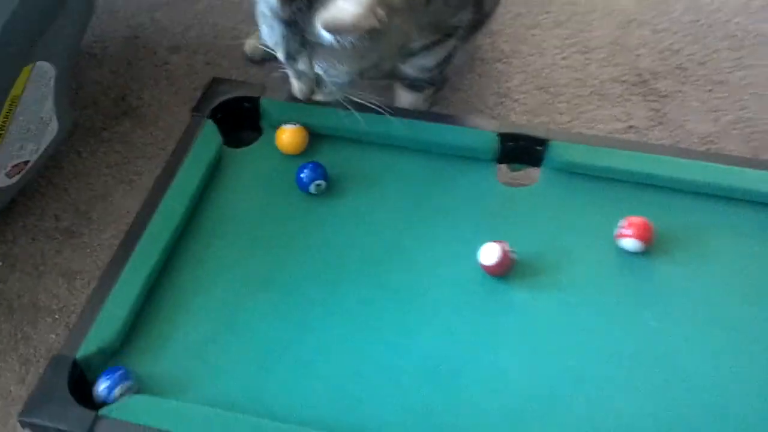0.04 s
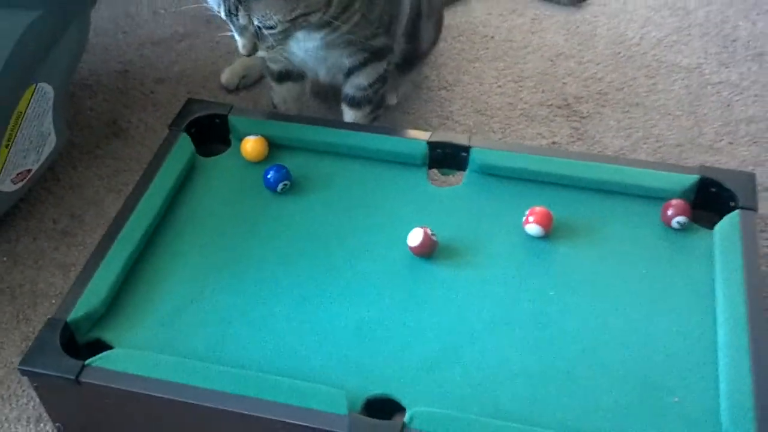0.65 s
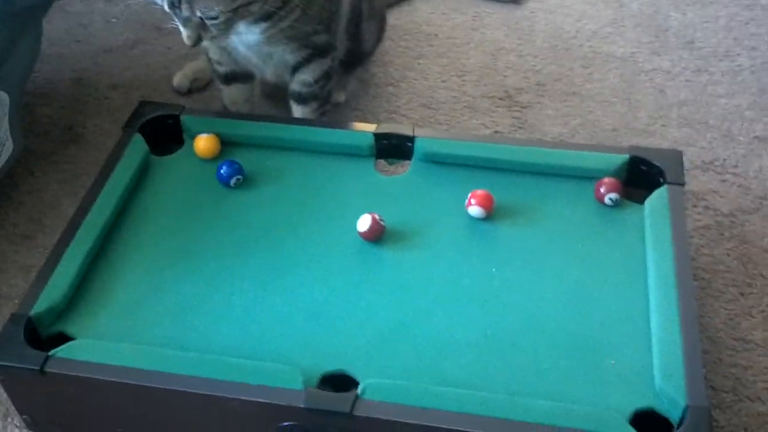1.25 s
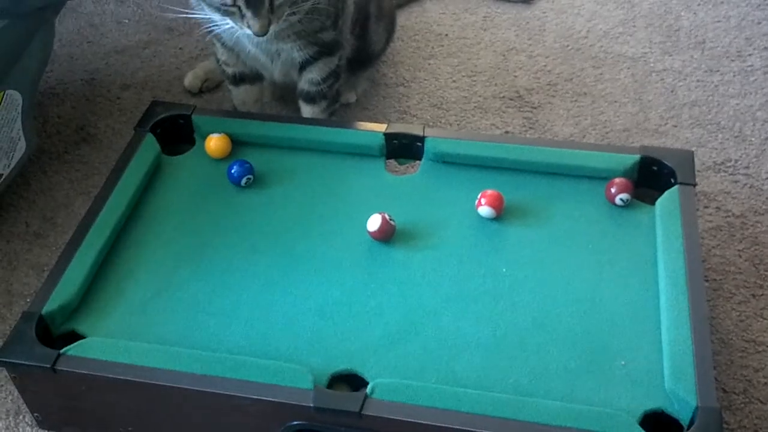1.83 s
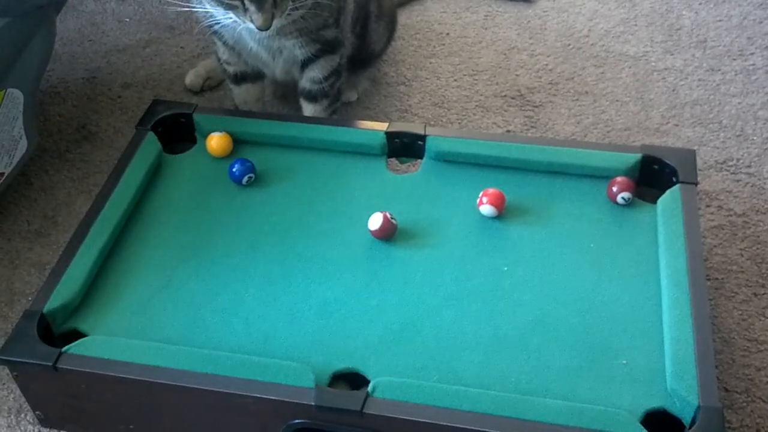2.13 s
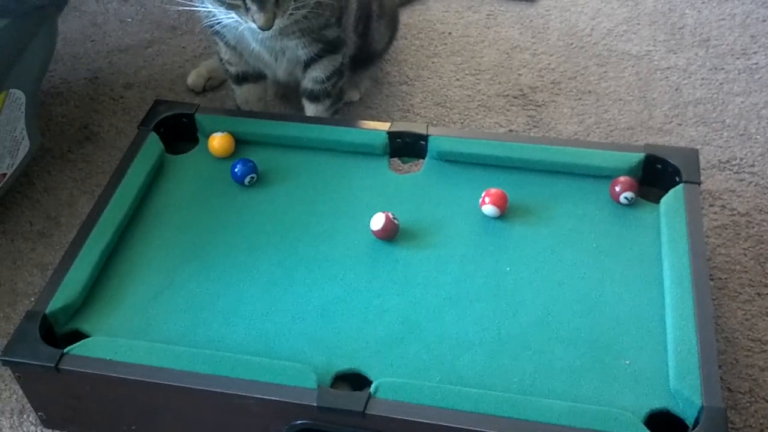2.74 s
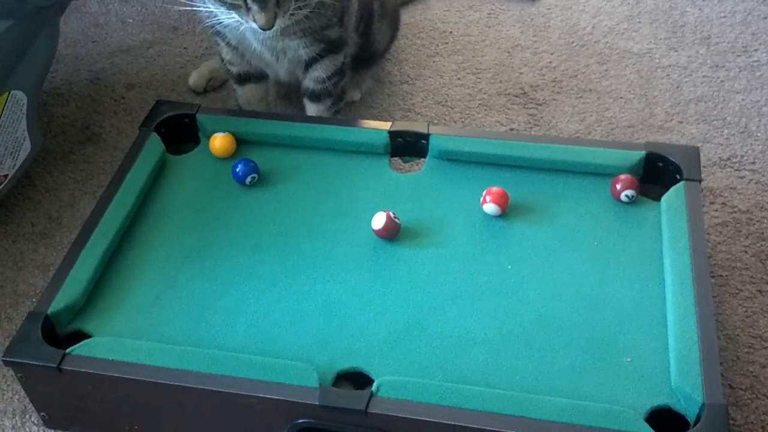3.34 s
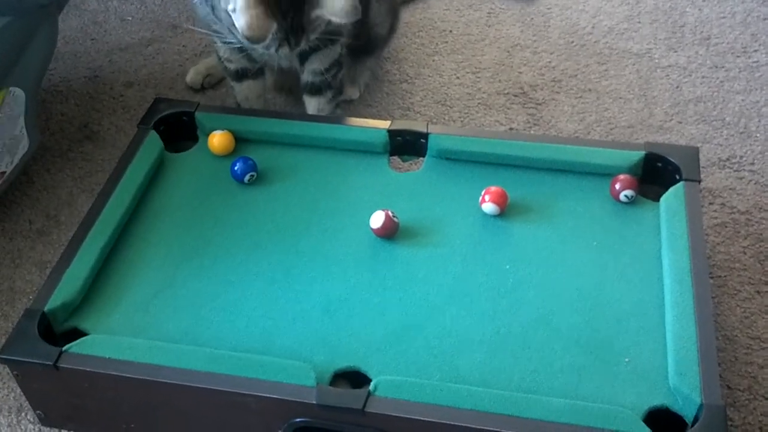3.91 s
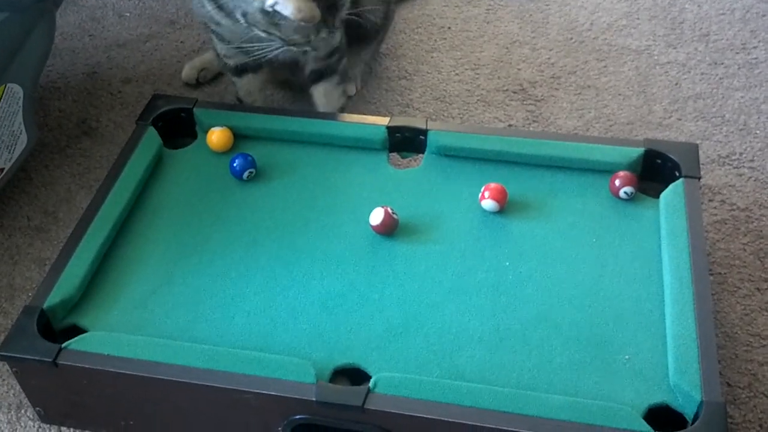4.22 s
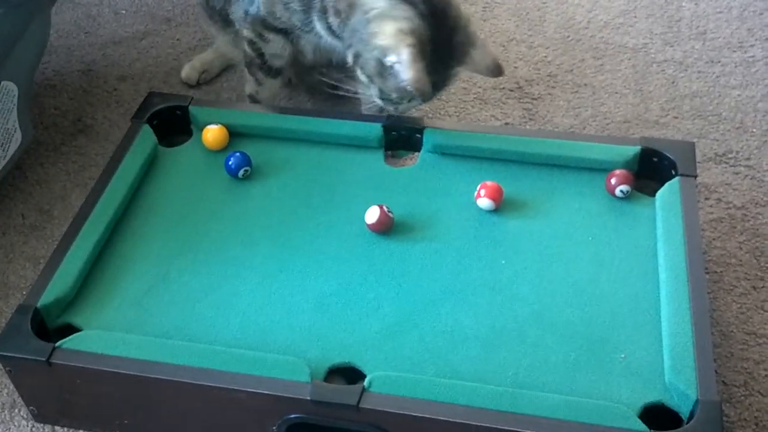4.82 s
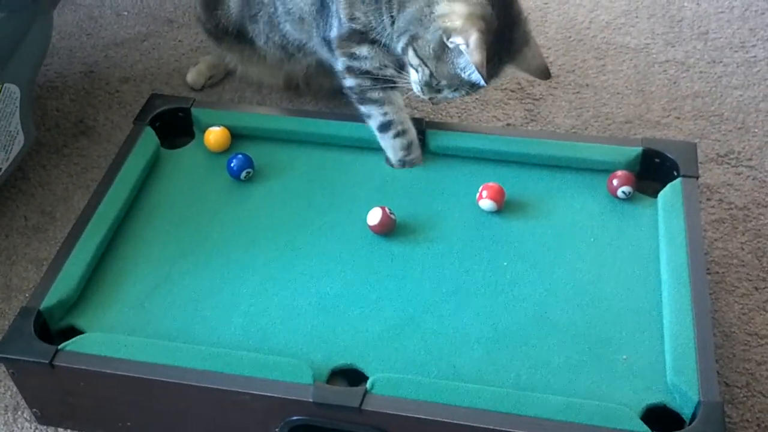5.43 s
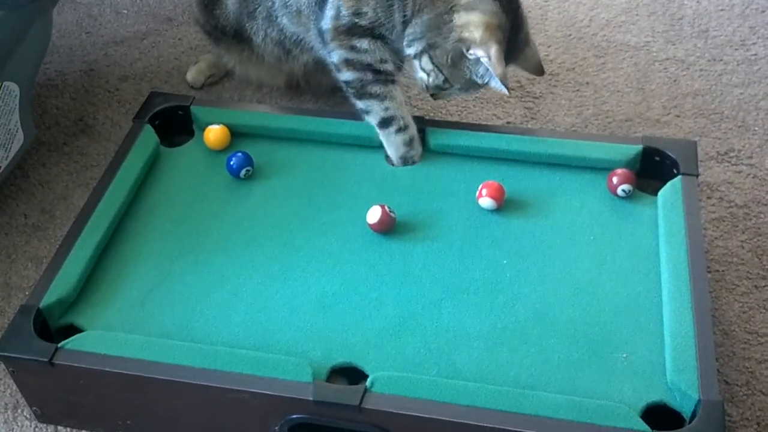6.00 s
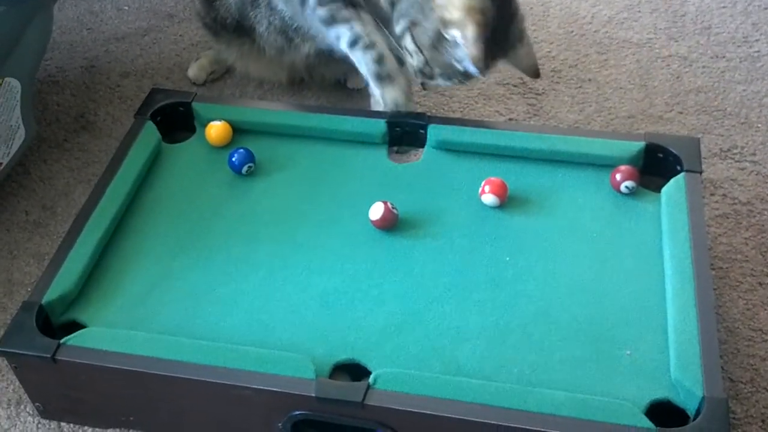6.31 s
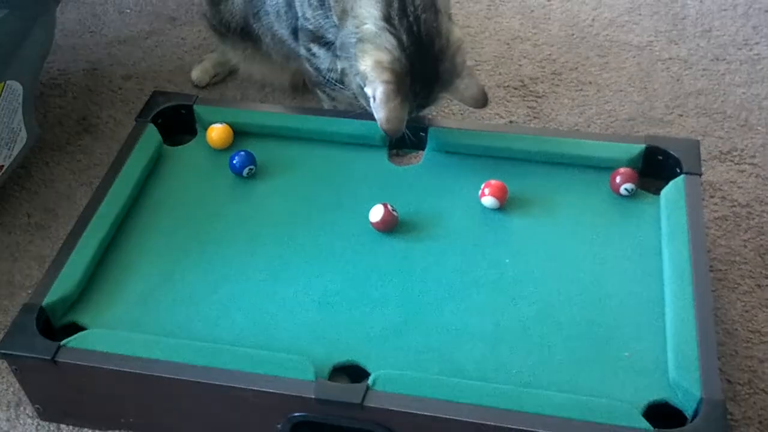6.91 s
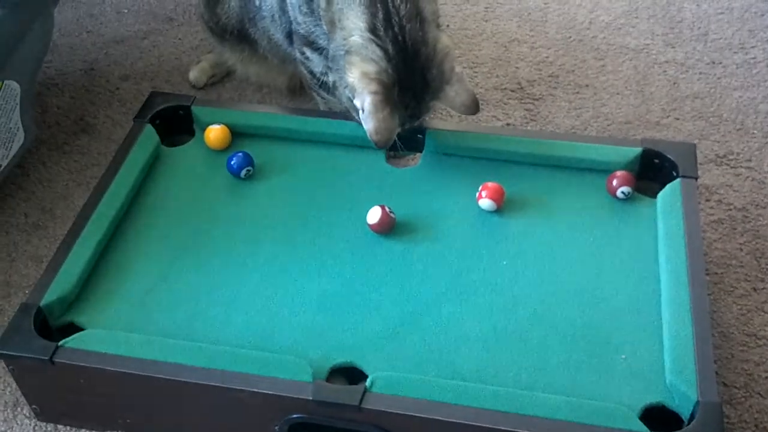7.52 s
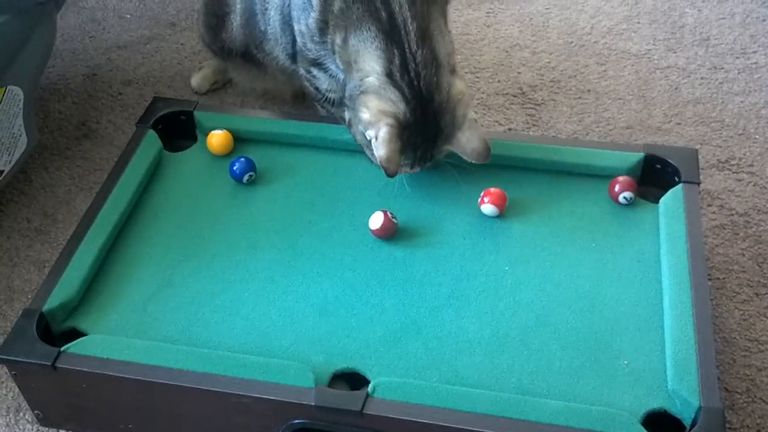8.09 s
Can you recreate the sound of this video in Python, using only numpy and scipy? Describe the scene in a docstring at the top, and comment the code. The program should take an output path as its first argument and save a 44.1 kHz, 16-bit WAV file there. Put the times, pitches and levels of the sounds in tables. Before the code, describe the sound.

Sharp clack and hollow rattling roll of a ball inside a toy pool table, then soft paw taps and lighter knocks over low room hum.

```python
"""A brief brush on cloth, then a ball clacks into a pocket: a cat is playing at a toy pool table.
The ball rolls down the return chute and rattles to rest; later a paw knocks a ball about a side pocket.
Each contact clicks and pings on plastic, knocks the frame and thuds the board. The carpeted room has a
low hum. Two close microphone ports are crossed into stereo; gain control ducks after the drop."""
import sys
import numpy as np
from scipy import signal
from scipy.fft import rfft, irfft, next_fast_len
from scipy.io import wavfile
from scipy.ndimage import uniform_filter1d, minimum_filter1d

SR = 44100
rng = np.random.default_rng(int(sys.argv[2]) if len(sys.argv) > 2 else 0)


def pcm_store(signal):
    """Save signal as 16-bit PCM."""
    levels = np.round(np.clip(np.atleast_2d(signal), -1, 1) * 32767)
    wavfile.write(sys.argv[1], SR, levels.astype(np.int16).T)


N = 359415
TIME = np.arange(N) / SR
AGE = TIME[:SR // 6]   # seconds since a blow


# Ball on pocket or chute. Each row: start in seconds, thud in dB, thud pitch in Hz, knock in dB,
# knock pitch in Hz, click in dB, click hardness in dB per octave, ping in dB.
BALL_HITS = [(0.132, -57, 473, -56.5, 1460, -77, -9, -75), (0.2273, -39.5, 726, -50, 905, -41.5, 13, -40),
             (0.2363, -11.5, 423, -19.5, 1720, -15, 5, -21.5), (0.2385, -22, 685, -25, 760, -42, -6, -42),
             (0.304, -30, 390, -30, 925, -36.5, 1, -29), (0.3253, -19, 414, -25.5, 770, -27.5, 1.5, -21.5),
             (0.3355, -42, 418, -39, 890, -45, 9, -56), (0.368, -26.5, 443, -38, 840, -44.5, -7, -48),
             (0.388, -31, 483, -38.5, 1096, -45.5, -2.5, -35), (1.335, -22.5, 338, -26, 1650, -25, -2, -38),
             (1.349, -30, 398, -41, 910, -57, -9, -60), (1.3595, -36, 300, -53, 1410, -51, 6, -56),
             (1.365, -41, 347, -45, 1570, -40, -2, -56), (1.386, -28, 640, -28.5, 1500, -29.5, 9, -39),
             (1.389, -30, 267, -39, 1340, -45, 0, -58), (1.404, -31, 340, -40, 1190, -52, -4, -65),
             (1.4235, -51, 348, -51, 1480, -47, 3, -65), (1.436, -30, 673, -36, 1360, -32, 9, -39),
             (1.446, -25.5, 305, -54, 1470, -41, 0, -55), (1.449, -27.5, 335, -24, 1780, -36, -6, -49),
             (1.462, -47, 328, -43, 1300, -38, 3, -60), (1.474, -27, 363, -31, 1250, -33.5, 5, -40),
             (1.499, -30, 316, -41, 795, -48, 5, -62), (1.509, -50, 348, -39.5, 1740, -45, 4, -40),
             (1.521, -39, 300, -59, 1300, -50, -3, -65.5), (1.5245, -28.5, 360, -44, 1380, -45, 4, -62),
             (1.537, -35.5, 242, -41, 1260, -46, -4, -60), (1.553, -46, 230, -46.5, 1390, -59, -12, -74),
             (1.6575, -25.5, 351, -36.5, 1810, -39, -4, -60), (1.748, -36, 348, -54, 1820, -56, -12, -80),
             (1.78, -52.5, 400, -60, 1400, -64, -9, -75), (1.8922, -24.5, 341, -32, 1710, -37.5, -6.5, -70),
             (1.97, -38.5, 377, -58, 1020, -71, -2, -75), (1.976, -40, 308, -58, 1940, -52, -4, -64),
             (1.9805, -40, 287, -38, 930, -46.5, -17, -65), (5.7948, -79, 500, -60, 1800, -40, -7, -51),
             (5.7972, -36, 333, -33.5, 960, -50, -9, -43), (5.8028, -32.5, 250, -37, 1710, -55, -11, -57),
             (6.5153, -38, 339, -34.5, 1020, -45.5, -14, -62), (6.526, -47, 270, -41.5, 940, -51, -16, -64),
             (6.5415, -45, 260, -47, 1480, -61, -9, -70), (6.589, -50, 436, -48.5, 1530, -70, -9, -72),
             (6.6852, -35.5, 496, -29, 1450, -41.5, 1, -39), (6.706, -35, 420, -34.5, 1400, -43, -11, -39),
             (6.7243, -31.5, 357, -34, 1033, -42, -1, -47), (6.7285, -43, 420, -38.5, 1380, -49, -7, -54),
             (6.737, -50, 336, -53, 1310, -45.5, -10, -62), (6.741, -38, 385, -38, 1230, -48, 3, -37.5),
             (6.754, -35, 281, -37, 1500, -50, -6, -41), (6.765, -44, 378, -42.5, 1620, -57, -9, -44),
             (6.773, -55, 300, -51, 1590, -62, -12, -54), (6.781, -38.5, 219, -71, 1300, -70, -9, -75),
             (6.842, -53, 400, -53, 1270, -74, -11, -70), (6.9458, -41, 335, -38.5, 1005, -53.5, -14, -71)]

def balls():
    """Each contact sounds board, frame and plastic. Returns head-on and sideways sound."""
    out = np.zeros((2, N))
    contacts = list(BALL_HITS) + seam_bumps() + chatter()
    for start, thud_db, thud_hz, knock_db, knock_hz, click_db, hardness, ping_db in contacts:
        ring_scale = ring_length(max(knock_db, thud_db - 3))
        modes = damped_modes(ring_scale)
        thud = board_thud(thud_hz, thud_db, modes, ring_scale)
        knock = frame_knock(knock_hz, modes, ring_scale)
        add(out, start, from_db(thud_db) * thud + from_db(knock_db) * knock)
        add(out[0], start, from_db(click_db) * click(hardness, ring_scale) + from_db(ping_db) * ping())
    return out


USUAL_BLOW_DB = -29.5

def ring_length(blow_db, halving_db=4.5):
    """Factor on decay times: the harder the blow, the more the ball damps the wood."""
    return np.clip(0.93 * 2 ** ((USUAL_BLOW_DB - blow_db) / halving_db), 0.39, 0.93)


# Dense modes of the board. Each row: frequency in Hz, relative level in dB.
THUD_SPECTRUM = [(120, -45.5), (220, 5), (380, 8.5), (540, -17), (760, -9), (900, -16.5), (1500, -62)]

def board_thud(hz, blow_db, modes, ring_scale):
    """The board's note, with an overtone that grows with the blow."""
    overtone_db = min(-34.5 + 6 * (blow_db - USUAL_BLOW_DB), 0)
    note = ring(hz, 0.04 * ring_scale, rise_s=0.001)
    overtone = from_db(overtone_db) * ring(2.9 * hz, 0.014 * ring_scale, rise_s=0.001)
    envelope = fade(0.14 * ring_scale, rise_s=0.00024)
    thud = body(note + overtone, hz, modes, THUD_SPECTRUM, envelope,
                modes_db=2, dense_db=2.5, side_db=-2, reach_octaves=0.54)
    # so small a board radiates little below its own note
    return cut(thud, 0.68 * hz, "high", order=3)


# Dense modes of the frame. Each row: frequency in Hz, relative level in dB.
KNOCK_SPECTRUM = [(500, -14.5), (900, 4), (1600, 5), (2100, -4), (2600, -10.5), (4000, -41), (8000, -55.5)]

def frame_knock(hz, modes, ring_scale):
    """The frame barks briefly, then rings on faintly."""
    note = ring(hz, 0.015 * ring_scale, rise_s=0.002)
    bark = fade(0.031 * ring_scale, rise_s=0.0008) + 0.1 * fade(0.13 * ring_scale, rise_s=0.0013)
    return body(note, hz, modes, KNOCK_SPECTRUM, bark,
                modes_db=-5, dense_db=-3, side_db=0, reach_octaves=0.52)


# Modes of board and frame. Each row: frequency in Hz, relative level in dB, free T60 in seconds.
WOOD_MODES = [(197.3, 4, 0.37), (232.2, 7, 0.5), (284.4, -1.5, 0.08), (350, -4.5, 0.05), (405, -3.5, 0.067),
              (617, -0.5, 0.091), (731.4, 6.5, 0.085), (801, 5, 0.082), (866, -0.5, 0.097), (968, 3, 0.15),
              (1052, -3, 0.07), (1268, 0, 0.18), (1360, 5, 0.094), (1447, 4, 0.08), (1568, 5.5, 0.041),
              (1650, 15, 0.041), (1770, 2.5, 0.026), (2110, -14, 0.028)]

def damped_modes(ring_scale):
    """One ring per mode, damped by the ball pressing on the wood."""
    free = np.array([ring(hz, t60_s, rise_s=0.0013) for hz, _, t60_s in WOOD_MODES])
    return free * np.exp(-max(1 / ring_scale - 1, 0) * AGE / 0.0026)


def body(note, note_hz, modes, spectrum, envelope, modes_db, dense_db, side_db, reach_octaves):
    """The struck spot's note, nearby modes and a dense ring. Returns head-on and sideways sound."""
    hz, db, _ = np.transpose(WOOD_MODES)
    nearness = np.exp(-.5 * (np.log2(hz / note_hz) / reach_octaves) ** 2)
    # neighbouring modes alternate in sign head-on; sideways the signs are random
    signs = np.array([(-1) ** np.arange(len(hz)), rng.choice([-1, 1], len(hz))])
    panels = []
    for strengths in signs * from_db(2.5 * rng.standard_normal((2, len(hz)))):
        modal = unit_blow((from_db(db) * nearness * strengths) @ modes)
        dense = unit_blow(colour(rng.standard_normal(len(AGE)), spectrum) * envelope)
        panels.append(from_db(modes_db) * modal + from_db(dense_db) * dense)
    head_on = unit_blow(unit_blow(note) + panels[0])
    return np.array([head_on, from_db(side_db) * unit_blow(panels[1])])


# Modes of ball on plastic. Each row: frequency in Hz, relative level in dB, T60 in seconds.
PLASTIC_MODES = [(2014, 5, 0.0087), (3330, 1.5, 0.0066), (3830, 6.5, 0.0022), (4300, -6, 0.0034),
                 (6310, -13, 0.0016), (7600, -2, 0.0024), (8900, -1, 0.0023), (9600, -4, 0.0012),
                 (12000, -12.5, 0.002)]
# Dense modes behind the click. Each row: frequency in Hz, relative level in dB.
SPLASH_SPECTRUM = [(1500, -40), (2300, -13), (2700, -12), (3300, 3.5), (4000, 4), (5000, -4.5), (5700, -4),
                   (6700, -10), (8700, -9.5), (11000, -20.5), (16000, -37)]

def click(tilt_db_per_octave, ring_scale, echo_s=0.0027, echo_db=-14, splash_db=-2):
    """Hard ball on plastic: a crack, a quick echo of it and a splash that dulls as it dies."""
    crack = np.zeros(len(AGE))
    for k, (hz, db, t60_s) in enumerate(PLASTIC_MODES):
        mode_db = db + tilt_db_per_octave * np.log2(hz / 3000) + 2 * rng.standard_normal()
        detune = 1 + 0.02 * np.clip(rng.standard_normal(), -2, 2)
        crack += (-1) ** k * from_db(mode_db) * ring(hz * detune, t60_s)
    lag_samples = round(echo_s * SR * rng.uniform(0.5, 1.4))
    echo = from_db(echo_db) * np.pad(crack, (lag_samples, 0))[:len(AGE)]
    noise = colour(rng.standard_normal(len(AGE)), SPLASH_SPECTRUM, tilt_db_per_octave)
    splash = noise * fade(0.025 * ring_scale, rise_s=0.00008)
    tail = 0.058 * cut(noise, 4300, "low", order=1) * fade(0.044 * ring_scale)
    return unit_blow(unit_blow(crack + echo) + from_db(splash_db) * unit_blow(splash + tail))


def ping(hz=2630):
    """The plastic lining rings at a slightly different pitch for each spot struck."""
    detune = 1 + 0.058 * rng.uniform(-1.9, 1)
    return unit_blow(ring(hz * detune, t60_s=0.019, rise_s=0.0003))


# Seams of the chute. Each row: start in seconds, thud level in dB.
CHUTE_SEAMS = [(0.497, -38.5), (0.717, -47.5), (0.9818, -32.5), (1.046, -43.5), (1.1828, -34),
               (1.2402, -38)]

def seam_bumps(thud_hz=394, knock_hz=1040):
    """The rolling ball bumps over seams. Returns rows like BALL_HITS."""
    return [(start, db, thud_hz, db - 14, knock_hz, db - 30.5, 0, db - 32) for start, db in CHUTE_SEAMS]


# A ball settling. Each row: start in seconds, end in seconds, initial knock level in dB.
SETTLING = [(1.4, 1.58, -57), (6.722, 6.79, -56)]

def chatter(gap_s=0.019, fade_db_per_s=28, thud_hz=332, knock_hz=1390):
    """Light, uneven touches between the walls. Returns rows like BALL_HITS."""
    touches = []
    for start, end, first_db in SETTLING:
        for k, (jitter, force, spot) in enumerate(rng.uniform(-1.2, 1, size=(12, 3))):
            onset = start + gap_s * (k + 0.54 * jitter)
            db = first_db - fade_db_per_s * (onset - start) + 3 * force
            detune = 2 ** (0.18 * spot)
            if onset < end:
                touches.append((onset, db + 12, thud_hz * detune, db, knock_hz * detune, db - 2, 0, db - 19))
    return touches


# The ball circles the pocket, creeps into the chute, speeds up, tumbles at its end and rebounds;
# last, a roll in the side pocket. Each row: start and end in seconds, first and last level in dB.
BALL_ROLLS = [(0.24, 0.38, -40, -41.5), (0.42, 0.80, -55, -59.5), (0.81, 1.33, -54.5, -42),
              (1.36, 1.55, -40, -52), (1.62, 2.00, -64.5, -55), (6.725, 6.76, -28.5, -43.5)]
# Ring at the chute's entry. Each row: start and end in seconds, first and last level in dB.
CHUTE_RING = [(0.81, 0.96, -59.5, -53.5)]
# The shaken board. Each row: frequency in Hz, relative level in dB.
ROLL_SPECTRUM = [(130, -23.5), (230, -3), (360, 0.5), (520, -16), (650, -2), (780, -13.5), (950, -15.5),
                 (1500, -24), (2500, -33.5), (6000, -48.5)]

def rolling(bumps_per_s=650, spread_db=3.5, side_db=-3, attack_s=0.01, t60_s=0.11):
    """The chute's grain jolts the ball and shakes the board. Returns head-on and sideways sound."""
    bumps = (rng.random((2, N)) < bumps_per_s / SR) * rng.choice([-1, 1], (2, N))
    bumps = bumps * from_db(spread_db * rng.standard_normal((2, N)))
    forces = [unit_rms(row) + 0.037 * rng.standard_normal(N) for row in bumps]
    head_on, sideways = [unit_rms(colour(force, ROLL_SPECTRUM)) for force in forces]
    out = strokes(BALL_ROLLS, attack_s, t60_s) * np.array([head_on, from_db(side_db) * sideways])
    hollow = signal.fftconvolve(bumps[0], ring(hz=810, t60_s=0.014, rise_s=0.0025))[:N]
    out[0] += strokes(CHUTE_RING, attack_s, t60_s) * unit_rms(hollow)
    return out


# Paw on the frame. Each row: start in seconds, level in dB, pitch in Hz.
PAW_TOUCHES = [(4.515, -53.5, 630), (4.604, -62, 870), (4.636, -65.5, 545), (5.995, -61, 990),
               (6.022, -59, 870), (6.153, -59.5, 1000), (6.184, -66, 1060), (6.365, -54, 615)]

def paws():
    """Padded touches: a dull tap with a short brush of fur."""
    out = np.zeros(N)
    for start, db, hz in PAW_TOUCHES:
        tap = ring(hz, t60_s=0.027, rise_s=0.0022)
        fur = colour(rng.standard_normal(len(AGE)), KNOCK_SPECTRUM) * fade(t60_s=0.23, rise_s=0.00082)
        add(out, start, from_db(db) * unit_blow(unit_blow(tap) + .5 * unit_blow(fur)))
    return out


# Rubs on the cloth. Each row: start and end in seconds, first and last level in dB.
CLOTH_RUBS = [(0.0, 0.13, -53, -59), (4.5, 4.66, -78, -79), (5.98, 6.2, -89, -84), (6.35, 6.45, -63, -69)]
# Rubbing noise. Each row: frequency in Hz, relative level in dB.
CLOTH_SPECTRUM = [(1500, -1), (3500, -3.5), (5500, -1), (9000, -4.5), (12000, -5.5), (16000, 0.5)]

def cloth():
    """Light rubbing on the cloth makes a faint, high hiss."""
    hiss = unit_rms(colour(rng.standard_normal(N), CLOTH_SPECTRUM))
    return strokes(CLOTH_RUBS, attack_s=0.054, t60_s=0.61) * hiss


# Ticks as the cat shifts. Each row: start in seconds, level in dB, pitch in Hz.
CAT_TICKS = [(2.485, -74.5, 7600), (4.516, -69, 4320), (6.378, -65, 3500), (6.41, -69, 6900),
             (7.585, -73, 5100), (7.895, -74, 7700), (8.08, -66, 7600)]

def ticks():
    """Tiny scratches, each a noise burst around one high pitch."""
    out = np.zeros(N)
    for start, db, hz in CAT_TICKS:
        scratch = rng.standard_normal(len(AGE)) * fade(t60_s=0.032)
        tick = signal.fftconvolve(scratch, ring(hz, t60_s=0.0041))
        add(out, start, from_db(db) * unit_blow(tick))
    return out


def room(x, wall_hz=2300, t60_s=0.13, wet_db=-23):
    """The short, soft tail of a carpeted room."""
    wet = []
    for _ in range(2):
        tail = cut(rng.standard_normal(len(AGE)), wall_hz, "low", order=1) * fade(t60_s, rise_s=0.0046)
        wet.append(signal.fftconvolve(x, tail / np.linalg.norm(tail))[:N])
    return from_db(wet_db) * diffuse(*wet)


# Hum and faint whine. Each row: frequency in Hz, level in dB, lag between ports in samples, waver depth.
HUM_TONES = [(119.4, -67.5, -19, 0.19), (175.7, -65.5, 17.5, 0.4), (212.5, -67.5, -18.5, 0.4),
             (298.4, -72, -15, 1), (418, -71.5, 20.5, 0.3), (445, -73.5, -34.5, 0.85),
             (6300, -95, 2.5, 0.8), (6460, -93, -3, 0.9)]

def hum(waver_hz=4):
    """Low hum and a faint electronic whine waver in strength and phase, each tone from its own side."""
    out = np.zeros((2, N))
    knots_s = np.linspace(0, N / SR, int(2 * waver_hz * N / SR) + 2)
    for hz, db, lag_samples, depth in HUM_TONES:
        drift = rng.standard_normal((2, 400))[:, :len(knots_s)]
        waver = 1 + depth * np.interp(TIME, knots_s, drift[0] + 1j * drift[1])
        tone = waver * np.exp(2j * np.pi * hz * TIME)
        lagged = tone * np.exp(-2j * np.pi * hz * lag_samples / SR)
        out += from_db(db) * unit_rms(np.real([tone, lagged]))
    return out


# Room air. Each row: frequency in Hz, noise density in dB.
AIR_SPECTRUM = [(40, -87.5), (80, -99), (120, -87.5), (250, -88), (450, -92), (800, -96), (1300, -102),
                (2000, -105), (4000, -110), (7000, -115), (10500, -118), (15000, -114)]

def air():
    """Steady rush and hiss of the room."""
    common, apart = [colour(rng.standard_normal(N), AIR_SPECTRUM) * np.sqrt(SR / 2) for _ in range(2)]
    return diffuse(common, apart)


def diffuse(common, apart, split_hz=1400):
    """Sound from all round: alike at both ports in the bass, unrelated in the treble."""
    apart = cut(apart, split_hz, "high", order=1)
    return np.array([common + apart, common - apart])


def from_db(db):
    """Decibels to gain."""
    return 10 ** (np.asarray(db) / 20)


def unit_rms(x):
    """Scale to rms 1."""
    return x / np.sqrt(np.mean(x ** 2) + 1e-20)


def unit_blow(x):
    """Scale to the energy of 10 ms at rms 1."""
    return x / np.sqrt(np.sum(x ** 2) / (SR / 100) + 1e-20)


def cut(x, hz, kind, order):
    """Butterworth low- or high-pass."""
    return signal.sosfilt(signal.butter(order, min(hz, .45 * SR), kind, fs=SR, output="sos"), x)


def colour(x, spectrum, tilt_db_per_octave=0):
    """Shape x by a tilted spectrum."""
    size = next_fast_len(len(x), real=True)
    bin_octaves = np.log2(np.maximum(np.fft.rfftfreq(size, 1 / SR), 1))
    hz, db = np.transpose(spectrum)
    octaves = np.log2(hz)
    gain_db = np.interp(bin_octaves, octaves, db + tilt_db_per_octave * (octaves - octaves[0]))
    return irfft(rfft(x, size) * from_db(gain_db), size)[:len(x)]


def fade(t60_s, rise_s=1e-5):
    """Envelope of a blow: quick rise, exponential decay."""
    return np.exp(-np.log(1000) * AGE / t60_s) * (1 - np.exp(-AGE / rise_s))


def ring(hz, t60_s, rise_s=1e-5):
    """One struck mode."""
    return np.sin(2 * np.pi * hz * AGE) * fade(t60_s, rise_s)


def strokes(rows, attack_s, t60_s):
    """Envelope of rolls or rubs: each sets in, ramps in dB and dies away."""
    envelope = np.zeros(N)
    for start, end, first_db, last_db in rows:
        ramp = from_db(np.interp(TIME, [start, end], [first_db, last_db]))
        attack = np.clip((TIME - start) / attack_s, 0, 1)
        release = np.exp(-np.log(1000) * np.maximum(TIME - end, 0) / t60_s)
        envelope += ramp * attack * release
    return envelope


def add(track, start_s, sound):
    """Mix a sound into the track."""
    i = max(round(start_s * SR), 0)
    track[..., i:i + sound.shape[-1]] += sound[..., :N - i]


# Air and hum sink a little midway. Each row: time in seconds, gain in dB.
BACKGROUND_DIP = [(3.75, 0.2), (4.0, -1.3), (5.7, -1.5), (5.9, 1)]

def scene():
    """Sound pressure at the two microphone ports; the far one hears the table duller."""
    background = from_db(np.interp(TIME, *np.transpose(BACKGROUND_DIP))) * (air() + hum())
    touches = paws() + cloth() + ticks()
    head_on, sideways = rolling() + balls()
    table = head_on + touches
    direct = np.array([table, cut(table, 1700, "low", order=1)])
    return direct + diffuse(0, sideways) + room(table) + background


def crossed_stereo(ports, lag_samples=16, boost_hz=600, floor_hz=60, low_cut_hz=110):
    """Each channel is its port minus the other one delayed; a shelf restores the cancelled bass."""
    pair = ports - np.pad(ports[::-1], ((0, 0), (lag_samples, 0)))[:, :N]
    shelf = signal.bilinear([1, 2 * np.pi * boost_hz], [1, 2 * np.pi * floor_hz], SR)
    return cut(signal.lfilter(*shelf, pair), low_cut_hz, "high", order=2)


def gain_control(x, ceiling_db=-15, release_db_per_s=5):
    """A loud blow pulls the gain down at once; it creeps back over seconds."""
    power = uniform_filter1d(np.mean(x ** 2, axis=0), size=220)
    excess_db = np.maximum(10 * np.log10(np.maximum(power, 1e-12)) - ceiling_db, 0)
    recovery_db = release_db_per_s * TIME
    duck_db = np.maximum.accumulate(excess_db + recovery_db) - recovery_db
    held_db = minimum_filter1d(-duck_db, size=200)
    return x * from_db(uniform_filter1d(held_db, size=100))


def record(dry):
    """Stereo matrix, gain control and a steep top cut at 15.9 kHz."""
    top_cut = signal.ellip(10, .1, 80, 15900, fs=SR, output="sos")
    return signal.sosfilt(top_cut, gain_control(crossed_stereo(dry)))


dry = scene()
out = record(dry)
pcm_store(out)
```